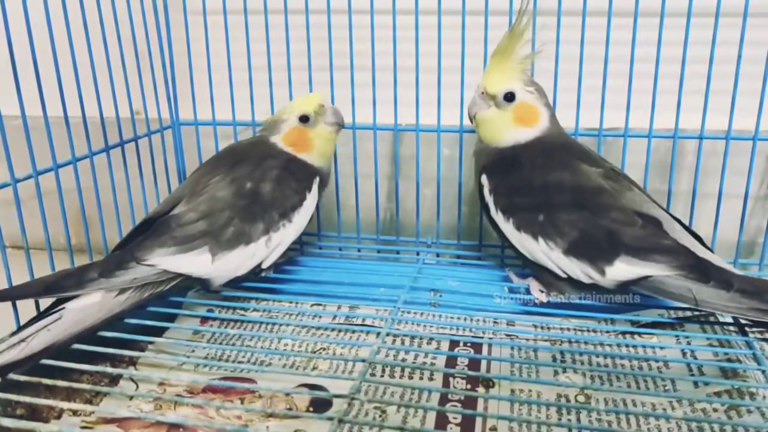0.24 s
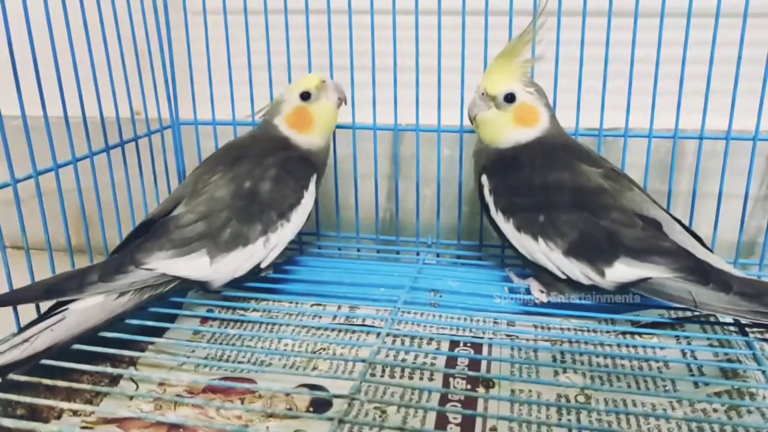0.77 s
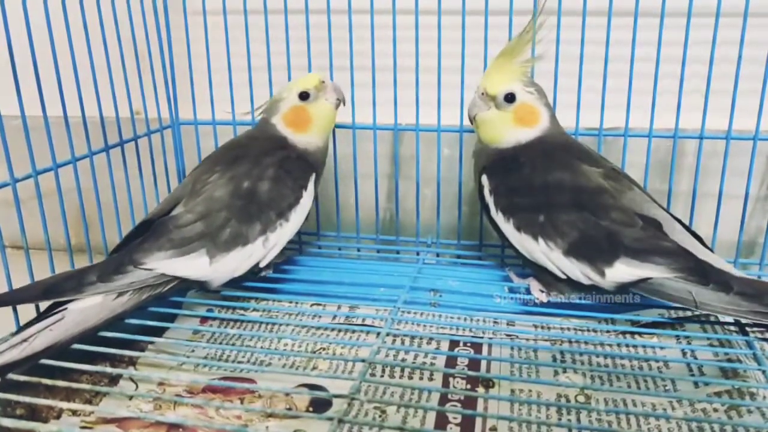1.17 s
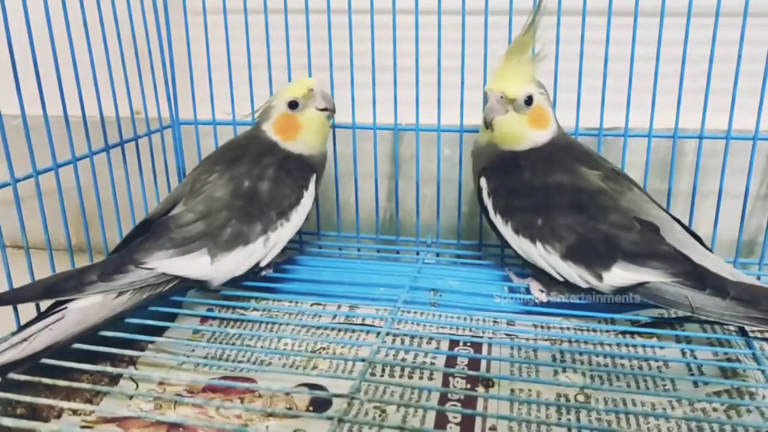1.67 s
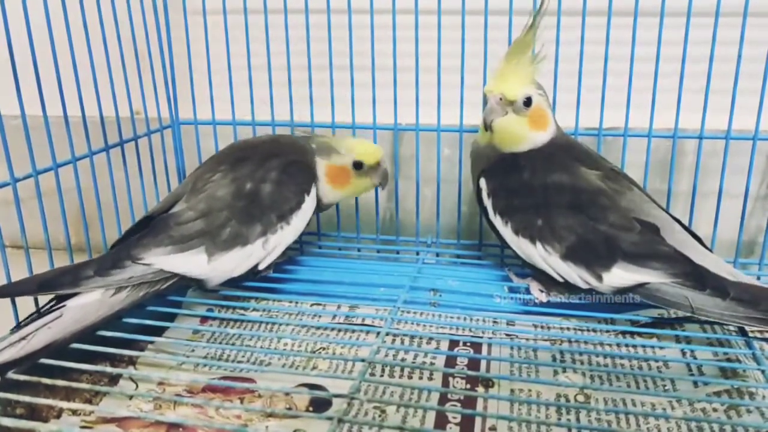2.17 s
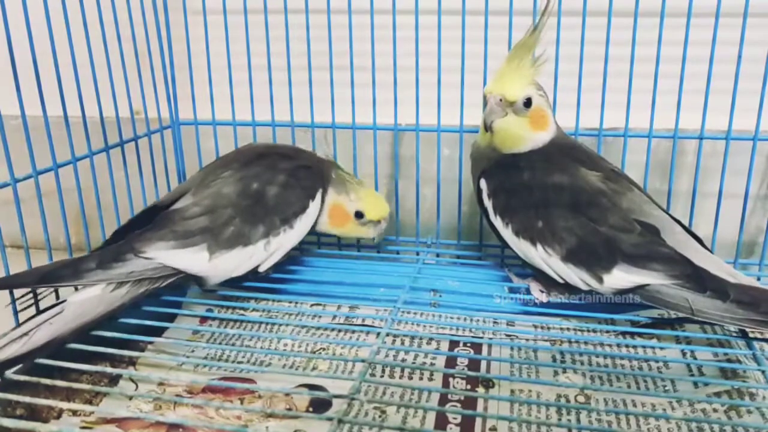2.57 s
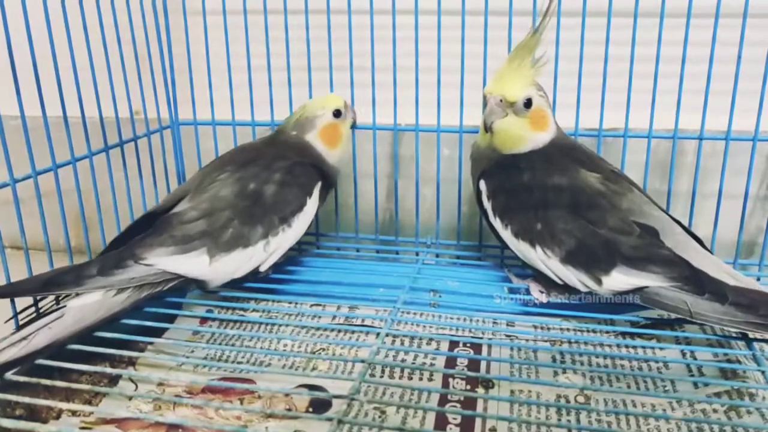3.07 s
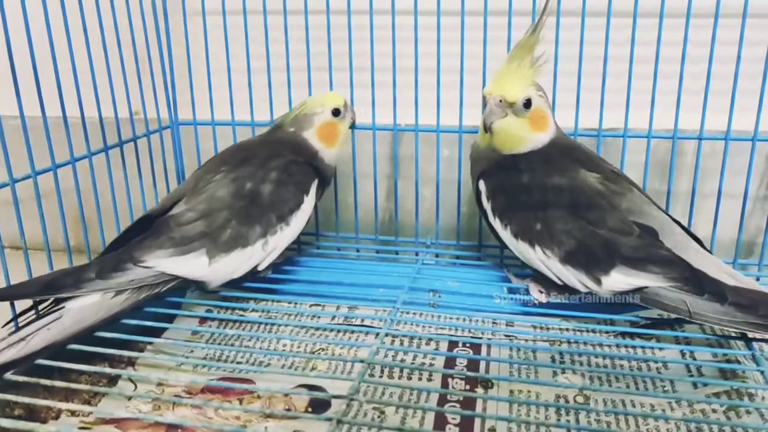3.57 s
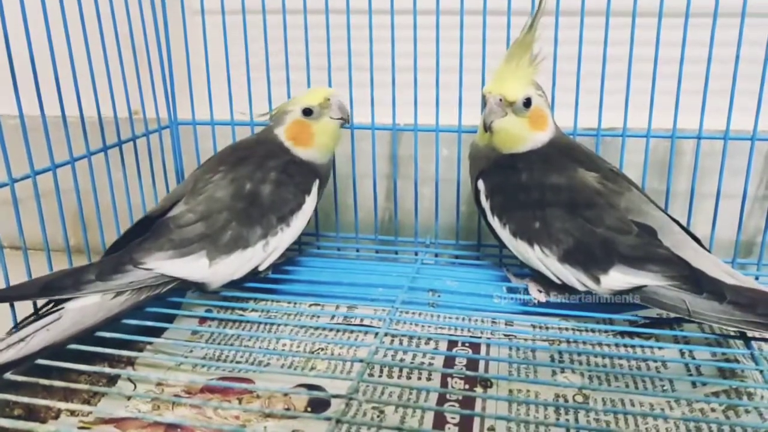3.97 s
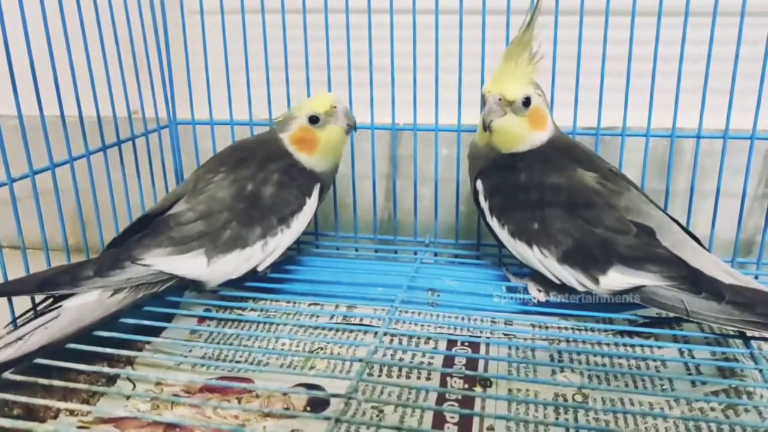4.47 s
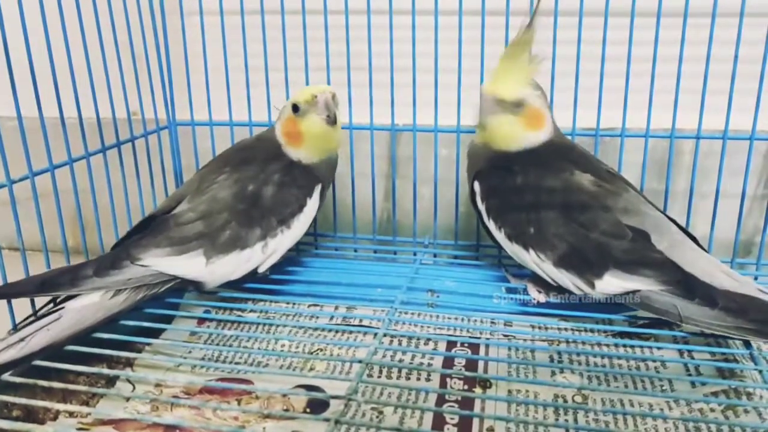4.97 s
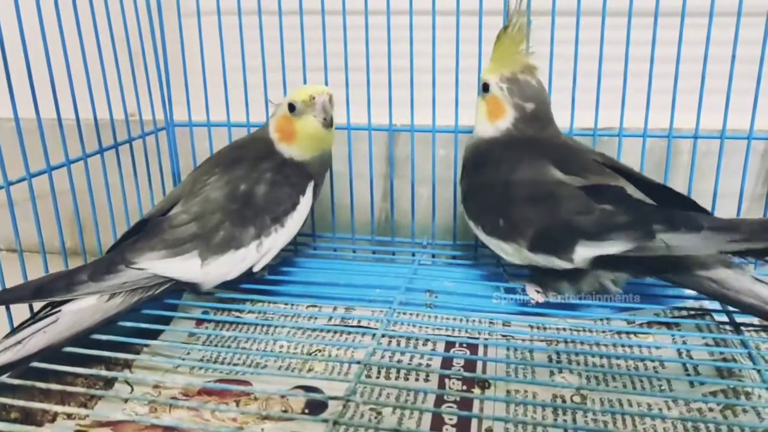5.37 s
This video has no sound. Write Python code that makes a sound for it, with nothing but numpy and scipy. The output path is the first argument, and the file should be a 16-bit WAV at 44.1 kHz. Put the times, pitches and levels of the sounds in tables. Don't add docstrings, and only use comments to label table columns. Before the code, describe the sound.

Quick bird phrases separated by pauses, heard near the microphones in a live indoor room: a loud whistle pair, then pips and a string of hoarse squawks and murmurs ending in a steep whistle, then silence but for hum. Near the end, dry beak ticks, small notes and the opening whistle pair returns. The walls answer with a short splashy reverb.

```python
import sys
import numpy as np
from scipy import signal
from scipy.fft import rfft, irfft, next_fast_len
from scipy.io import wavfile
from scipy.ndimage import uniform_filter1d

SR = 44100
rng = np.random.default_rng(int(sys.argv[2]) if len(sys.argv) > 2 else 0)


def invert_db(level):
    return 10 ** (np.asarray(level, dtype=float) / 20)


def bounce(signal):
    frames = np.transpose(np.atleast_2d(signal))
    limited = np.clip(frames, -1, 1)
    pcm = np.round(limited * 32767).astype(np.int16)
    wavfile.write(sys.argv[1], SR, pcm)


N = 248283


def at_hz(points, hz):
    known_hz, values = np.array(points).T[:2]
    return np.interp(np.log(np.maximum(hz, 1)), np.log(known_hz), values)


def coloured(points, size):
    hz = np.arange(N // 2 + 1) * SR / N
    white = rng.standard_normal((size, N))
    noise = irfft(rfft(white) * invert_db(at_hz(points, hz)), N)
    return noise / noise.std()


def wobble(hz):
    smooth = signal.butter(2, hz, fs=SR, output="sos")
    slow = signal.sosfilt(smooth, rng.standard_normal(N))
    return slow / slow.std()


def resonate(x, modes):
    out = 0
    for k, (hz, width_hz, level_db) in enumerate(modes):
        r = np.exp(-np.pi * width_hz / SR)
        b = [(1 - r * r) / 2, 0, (r * r - 1) / 2]
        a = [1, -2 * r * np.cos(2 * np.pi * hz / SR), r * r]
        ringing = signal.lfilter(b, a, signal.lfilter(b, a, x))
        out = out + (-1) ** k * invert_db(level_db) * ringing
    return out / out.std()


def played(rows, shape):
    notes = []
    for start_s, length_s, start_hz, end_hz, level_db in rows:
        notes.append([(start_s + part * length_s, start_hz + glide * (end_hz - start_hz),
                       level_db + change_db, *colour)
                      for part, glide, change_db, *colour in shape])
    return notes


def voiced(notes, *voice):
    return [[(*row, *voice) for row in note] for note in notes]


def gestures(notes, edge_s, glide_s):
    t = np.arange(N) / SR
    held, is_open = [], np.zeros(N, bool)
    for note in sorted(notes):
        first, last = note[0], note[-1]
        held += [(first[0] - .004, *first[1:]), *note, (last[0] + .004, *last[1:])]
        is_open |= (t >= first[0] - .003) & (t < last[0] + .003)
    rows = np.array(held)
    valve = 1. * is_open
    closing = np.roll(uniform_filter1d(valve, int(.006 * SR)), -int(.003 * SR))
    valve = closing * uniform_filter1d(valve, max(int(edge_s * SR), 1))
    times = np.maximum.accumulate(rows[:, 0])
    pitch, *levels = [np.interp(t, times, column) for column in rows.T[1:]]
    levels = uniform_filter1d(levels, int(.004 * SR))
    pitch = uniform_filter1d(pitch, max(int(glide_s * SR), 1))
    return valve, pitch, levels


# (frequency [Hz], level [dB per Hz])
HUM = [(12, -55.5), (20, -19.5), (48, -4.5), (86, -11), (110, 0), (134, -8.5), (187, -2.5), (301, -9),
       (337, -15), (434, -13), (849, -15), (1760, -27), (2320, -28), (7110, -43.5), (16000, -36.5)]
# (frequency [Hz], likeness [-1 to 1])
HUM_LIKENESS = [(60, 0.87), (180, 0.99), (550, 0.68), (1650, -0.94), (4970, -0.09), (15000, -0.51)]


def house_hum(bird):
    hum_db, swell_db, swell_hz, swell_from_db = -57 + 4.0, 5.0, 2.1, -50
    hz = np.arange(N // 2 + 1) * SR / N
    mid, side = rfft(coloured(HUM, size=2))
    alike = np.clip(at_hz(HUM_LIKENESS, hz), 0, 1)
    both = np.sqrt(1 + alike) * mid + np.sqrt(1 - alike) * side * [[1], [-1]]
    both = irfft(both, N) / np.sqrt(2)
    calling = uniform_filter1d(bird[0] ** 2, SR // 50) > invert_db(2 * swell_from_db)
    opened = signal.sosfilt(signal.butter(1, swell_hz, fs=SR, output="sos"), 1. * calling)
    return invert_db(hum_db + swell_db * opened) * both


# (frequency [Hz], time [s])
ROOM_T60 = [(500, 0.53), (1500, 0.31), (3000, 0.31), (6000, 0.16), (12000, 0.038)]
# (frequency [Hz], level [dB])
ROOM_DB = [(700, -1), (1500, -1), (2500, 0), (4000, 0), (6000, -1), (14000, 0)]
# (frequency [Hz], level [dB])
SHADOW = [(1000, 1), (2500, 3), (5000, 2), (9000, -3), (14000, -1)]
# (frequency [Hz], phase [radians])
PORT_LEAD = [(300, 0), (1400, 1.2), (2900, .8), (4300, 1.9), (4900, 1.9), (6300, 2.3), (6900, 4.2),
             (7600, 4.4), (9600, 6.2), (13000, 9), (16600, 13)]


def room(bird):
    hall_db, hall_t60_s = -14.5, 0.34
    near_db, near_t60_s = -15.5, 0.022
    t = np.arange(SR * 2 // 3) / SR
    edges = 500 * 2 ** np.arange(0, 5.1, .5)
    white, echoes = rng.standard_normal((3, len(t))), 0
    onset = np.clip((t - .002) / .004, 0, 1)
    for low, high in zip(edges, edges[1:]):
        hz = np.sqrt(low * high)
        band = signal.butter(2, [low, high], "band", fs=SR, output="sos")
        shared, left, right = signal.sosfilt(band, white)
        alike = np.clip(400 / hz, 0, 1) ** 2
        walls = invert_db(-60 * t / at_hz(ROOM_T60, hz))
        hall = invert_db(hall_db - 60 * t / hall_t60_s)
        near = invert_db(near_db - 60 * t / near_t60_s)
        decay = onset * (walls + hall + near)
        decay *= invert_db(at_hz(ROOM_DB, hz)) / np.sqrt(np.sum(decay ** 2))
        own = np.array([left, right])
        echoes = echoes + decay * (np.sqrt(alike) * shared + np.sqrt(1 - alike) * own)
    size = next_fast_len(N + len(t))
    hz = np.arange(size // 2 + 1) * SR / size
    half = invert_db(at_hz(SHADOW, hz) / 2)
    direct = np.array([half, np.exp(-1j * at_hz(PORT_LEAD, hz)) / half])
    return irfft(rfft(bird, size) * (direct + rfft(echoes, size)), size)[:, :N]


# (frequency [Hz], width [Hz], level [dB])
RUSTLE_MODES = [(3340, 1050, 2), (4840, 1430, -4)]


def feathers():
    start_s, level_db, fade_db_per_s = 0.74, -56.5, 73
    since = np.arange(N) / SR - start_s
    level = (since > 0) * invert_db(level_db - fade_db_per_s * np.abs(since))
    return level * resonate(rng.standard_normal(N), RUSTLE_MODES)


# (time [s], peak level [dB])
BEAK_CLICKS = [
    (4.131, -32.5),
    (4.368, -41),
]
# (frequency [Hz], level [dB], time to fall 60 dB [s])
BEAK_MODES = [(1850, 8.5, 0.026), (3380, 17, 0.0045), (5470, 8, 0.0072), (6980, -30, 0.002)]


def beak():
    clicks, out = np.zeros(N), np.zeros(N)
    for time_s, peak_db in BEAK_CLICKS:
        clicks[round(time_s * SR)] = invert_db(peak_db - 13.5)
    for hz, level_db, t60_s in BEAK_MODES:
        r, w = invert_db(-60 / (t60_s * SR)), 2 * np.pi * hz / SR
        b, a = [0, invert_db(level_db) * np.sin(w)], [1, -2 * r * np.cos(w), r * r]
        out += signal.lfilter(b, a, clicks + 1e-18)
    return out


# (time [s], length [s], start pitch [Hz], end pitch [Hz], level [dB])
CROAKS = [
    (0.0, .016, 1342, 1394, -39.5),
    (.024, .042, 1000, 1333, -29.5),
    (.49, .012, 1300, 1600, -23),
    (1.86, .07, 1032, 905.4, -26.5),
    (2.802, .016, 1300, 1579, -37.5),
    (4.427, 0.038, 993.4, 1313, -26),
    (4.887, .012, 1300, 1668, -27.5),
]
SQUAWKS = [
    (2.055, .082, 1256, 1688, -25.5),
    (2.265, .075, 1238, 1633, -26),
]
GRATES = [
    (2.479, 0.053, 1138, 1566, -29),
    (2.652, 0.035, 1454, 958, -43),
]
# (share of length, share of glide done, rasp change [dB],
# then against the rasp: tone [dB], second overtone [dB], spray [dB])
CROAK_SHAPE = [(0, 0.083, -9, -30, -16, -40), (.2, 0.065, -1.5, -29.5, -11.5, -39),
               (.6, .2, -2, -31, -8.5, -40.5), (.85, .95, 0.5, -12, -3, -41.5),
               (1, 0.95, -9.5, -16.5, -0.5, -38)]
SQUAWK_SHAPE = [(0, 0, -19, -3, -29, -24.5), (.22, 0.76, -1, -10, -35, -28.5), (0.451, 1, -2, 7, -24, -29),
                (0.649, .85, -1.5, -3, -40.5, -35), (1.001, .3, -10, -3.5, -25, -26.5)]
GRATE_SHAPE = [(0, 0.14, -10, 1, -22.5, -18), (.25, 0.3, 0, 5, -25.5, -25), (0.502, 1, 2, 3, -19.5, -17.5),
               (1.001, 0.76, -11.5, 0.5, -21.5, -27.5)]
# (frequency [Hz], width [Hz], level [dB])
RASP_MODES = [(1070, 450, -6.5), (1860, 530, 2), (3070, 1000, -0.5), (4070, 840, -3.5), (5593, 1100, -8.5),
              (6970, 1700, -20.5), (8150, 2900, -26.5)]
# (frequency [Hz], width [Hz], level [dB])
SPRAY_MODES = [(12200, 610, -11.5), (14740, 1700, 0.5)]


def squawks():
    notes = voiced(played(CROAKS, CROAK_SHAPE), -13)
    notes += voiced(played(SQUAWKS, SQUAWK_SHAPE), -3)
    notes += voiced(played(GRATES, GRATE_SHAPE), 5)
    valve, pitch, levels = gestures(notes, edge_s=0.0013, glide_s=0.011)
    rasp_db, first_db, second_db, spray_db, edge_db = levels
    shake = wobble(hz=250)
    phase = 2 * np.pi * np.cumsum(pitch * (1 + .022 * shake)) / SR
    tone = invert_db(first_db) * np.sin(phase) + invert_db(second_db) * np.sin(2 * phase + 1)
    cycles = np.cumsum(pitch * (1 + .07 * shake)) / SR
    snaps = np.diff(np.floor(cycles), prepend=0)
    snaps *= invert_db(5.0 * np.clip(rng.standard_normal(N), -3, 1.2))
    air = 0.81 * invert_db(2.0 * wobble(hz=250.2)) * rng.standard_normal(N)
    source = snaps / snaps.std() + air
    throat = resonate(source, RASP_MODES)
    edge = signal.sosfilt(signal.butter(4, 3600, "high", fs=SR, output="sos"), throat)
    spray = resonate(source, SPRAY_MODES)
    rasp = invert_db(-0.5) * throat + invert_db(edge_db) * edge + invert_db(spray_db) * spray
    flutter = invert_db(2.5 * wobble(hz=120))
    return valve * invert_db(rasp_db) * (np.sqrt(2) * flutter * tone + rasp)


# (time [s], pitch [Hz], level [dB], overtone slope as the beak opens [dB per octave])
HIGH_ARCHES = [
    [(.232, 1941, -33.5, -11.5), (.25, 2017, -20.5, -22), (.259, 2461, -20.5, -7.5), (.289, 2267, -17, -4),
     (.343, 2534, -21.5, 4), (.39, 2260, -19, 1.5), (.41, 2167, -15.5, 6), (.424, 1841, -10.5, 7),
     (.428, 1676, -57, 12.5)],
    [(4.638, 1790, -26.5, 2), (4.652, 1973, -19, -20), (4.664, 2240, -19, -5.5), (4.69, 2269, -22, 4.5),
     (4.752, 2488, -17, 10), (4.79, 2273, -18, 4), (4.814, 2165, -16.5, 0), (4.827, 1833, -19, 3.5)],
]
LOW_ARCHES = [
    [(.488, 935.3, -37, -9), (.506, 1347, -20, -9.5), (.53, 1442, -21, 3.5), (.554, 1486, -19.5, -16),
     (.588, 1514, -22.5, -28), (.612, 1291, -25.5, -16), (.637, 945, -31, -18)],
    [(4.889, 1062, -25.5, -13), (4.905, 1410, -19.5, -7.5), (4.93, 1456, -16, 4.5),
     (4.968, 1528, -22, -42.5), (4.99, 1425, -25.5, -9), (5.014, 1244, -25.5, -23.5),
     (5.032, 950, -29, -17.5)],
]
STEEP_ARCH = [(2.808, 1459, -34.5, -20), (2.818, 1780, -19.5, -22.5), (2.839, 2486, -24, -10),
              (2.86, 2580, -24, -16.5), (2.895, 2582, -17.5, -15), (2.906, 2249, -20, -25.5),
              (2.925, 1602, -21, -13.5), (2.94, 1198, -40.5, -14), (2.95, 1009, -34, -15)]
# (time [s], length [s], start pitch [Hz], end pitch [Hz], level [dB])
PIPS = [
    (1.648, .013, 1085, 1114, -27),
    (1.72, .011, 1242, 1277, -26),
    (4.064, .008, 1043, 1028, -23.5),
    (4.388, .005, 890.6, 885, -36),
]
FLICKS = [
    (.175, 0.014, 1500, 1703, -18.5),
    (4.579, .017, 1463, 1670, -14.5),
]
MURMURS = [
    (.085, .052, 974, 1036, -37.5),
    (2.575, .04, 933.7, 1190, -30.5),
    (2.712, .043, 973, 1543, -27),
    (4.485, .05, 982, 1050, -33.5),
]
# (share of length, share of glide done, level change [dB],
# overtone slope [dB per octave])
PIP_SHAPE = [(0, 0, -7, -2), (.6, 0.045, 3.5, 3), (1, 1, 3, -12.5)]
FLICK_SHAPE = [(0, 0.06, -11, -2), (0.352, 0.38, -3, -1.5), (.7, 1, -3, -12), (1, 1, -2, -6)]
MURMUR_SHAPE = [(0, 0.16, -13, -19.5), (0.298, .6, -1, -23.5), (.55, 0.96, -3, -28),
                (1.001, 0.93, -5.5, -18.5)]
# (frequency [Hz], level [dB])
THROAT = [(1000, -15), (1500, -5.5), (2400, -3), (3300, 6), (4800, -15), (6500, -21.5), (10000, -49),
          (16000, -57.5)]
# (frequency [Hz], level [dB])
HAZE = [(1000, -23), (2500, -15.5), (4000, -23.5), (6000, -19), (8000, -33), (10000, -43), (13000, -34.5),
        (15500, -42.5)]
# (frequency [Hz], level [dB per Hz])
BREATH = [(900, -20), (1500, -29.5), (2500, 12), (4000, -6), (6000, 5), (8000, -14), (12000, -17),
          (15500, -17)]


def whistles():
    notes = voiced(HIGH_ARCHES, 1.4, -1.2)
    notes += voiced(LOW_ARCHES, 7.1, 4)
    notes += voiced([STEEP_ARCH], -6.5, 8.8)
    notes += voiced(played(PIPS, PIP_SHAPE), -1.5, -2.3)
    notes += voiced(played(FLICKS, FLICK_SHAPE), 7.2, -1.5)
    notes += voiced(played(MURMURS, MURMUR_SHAPE), -1.5, 3)
    valve, pitch, levels = gestures(notes, edge_s=0.001, glide_s=0.0048)
    loudest_db, slope_db, even_db, husky_db = levels
    phase = 2 * np.pi * np.cumsum(pitch * (1 + .004 * wobble(hz=120))) / SR
    flutter = invert_db(2.0 * wobble(hz=90))
    air, gust = wobble(hz=200), wobble(hz=700)
    clean = []
    for k in range(1, 13):
        overtone_db = at_hz(THROAT, k * pitch) + slope_db * np.log2(k) + even_db * (k % 2 == 0)
        clean.append(invert_db(overtone_db))
    total, tone = np.sqrt(np.sum(np.square(clean), axis=0)), 0
    for k in range(1, 13):
        haze_db = at_hz(HAZE, k * pitch) + np.minimum(even_db, 0) * (k % 2 == 0)
        shaking = np.roll(air if k < 5 else gust, 999 * k) + .5
        strength = clean[k - 1] / total + invert_db(haze_db) * shaking
        tone += strength * (k * pitch < .4 * SR) * np.sin(k * phase + k * k)
    leak_db = -29 + husky_db - 8 * np.log2(pitch / 2000)
    breath = invert_db(leak_db) * coloured(BREATH, size=1)[0]
    return valve * invert_db(loudest_db) * (np.sqrt(2) * flutter * tone + breath)


def scene():
    bird = room(whistles() + squawks() + beak() + feathers())
    return bird + house_hum(bird)


def band_limit(x):
    return signal.sosfilt(signal.butter(12, 17020, fs=SR, output="sos"), x)


def record(dry):
    top_cut = signal.ellip(12, .3, 70, 15850, fs=SR, output="sos")
    mix = signal.sosfilt(top_cut, dry)
    return band_limit(mix)


dry = scene()
out = record(dry)
bounce(out)
```